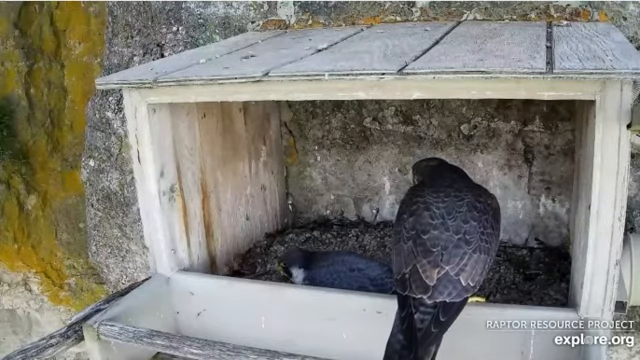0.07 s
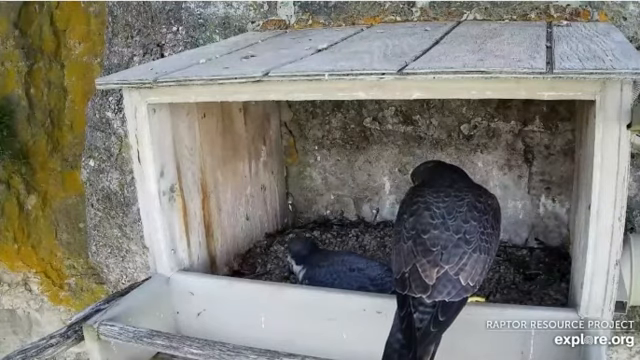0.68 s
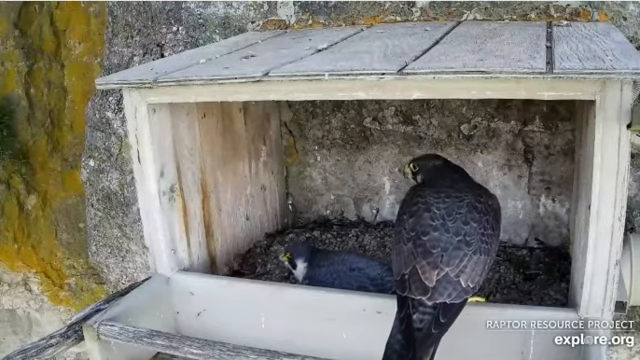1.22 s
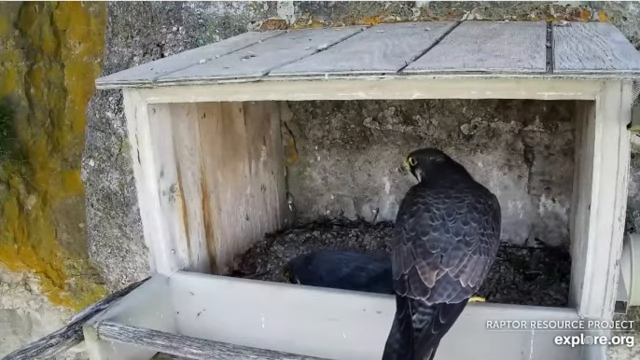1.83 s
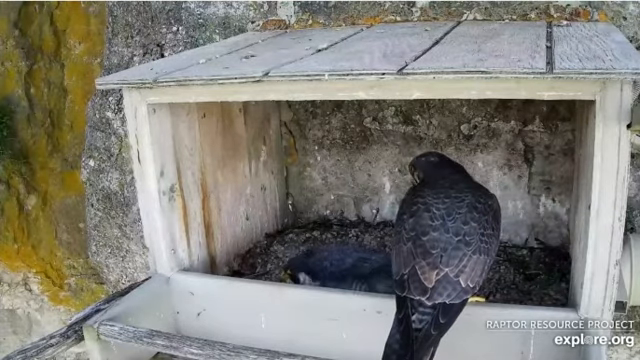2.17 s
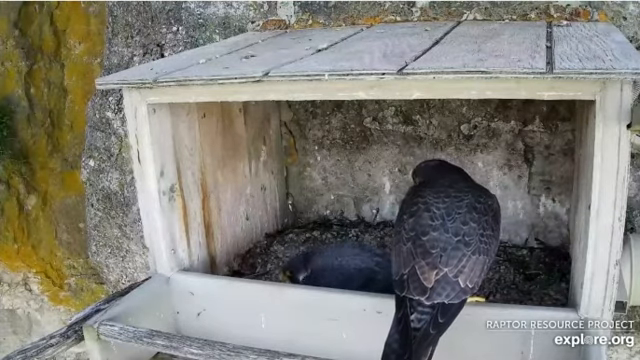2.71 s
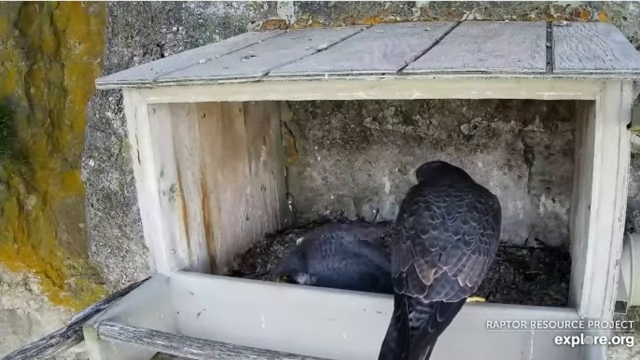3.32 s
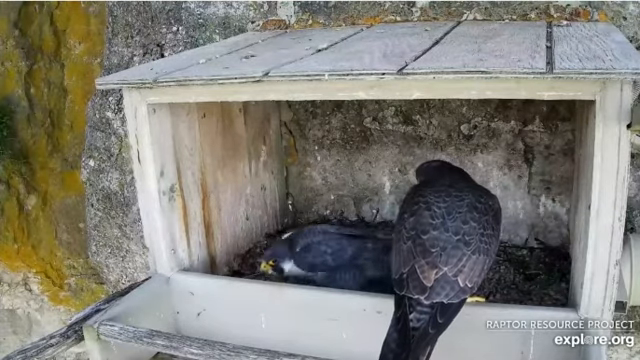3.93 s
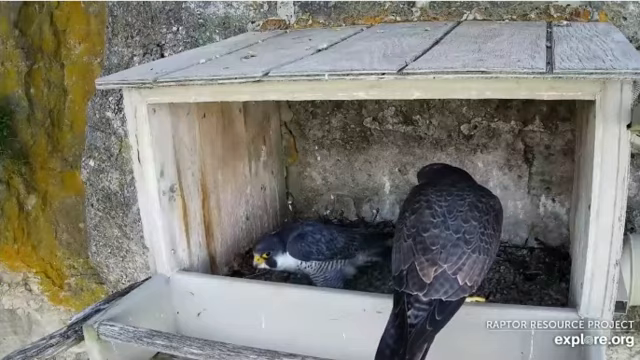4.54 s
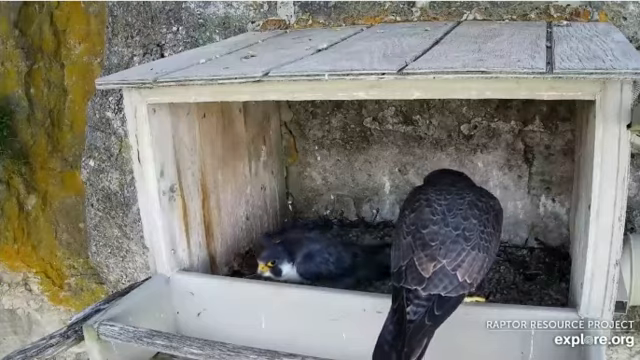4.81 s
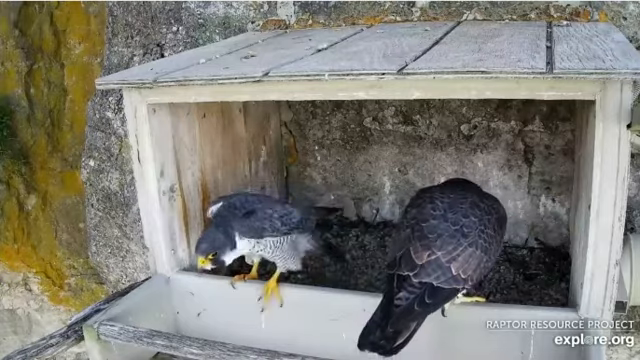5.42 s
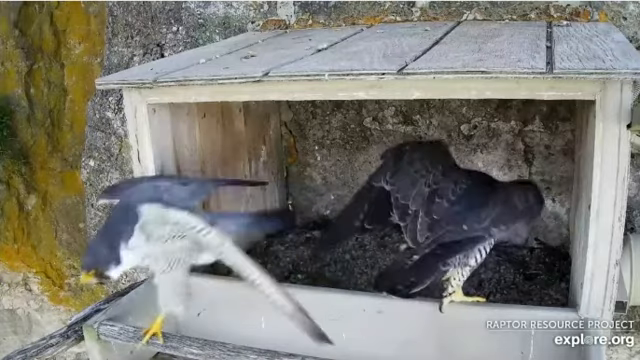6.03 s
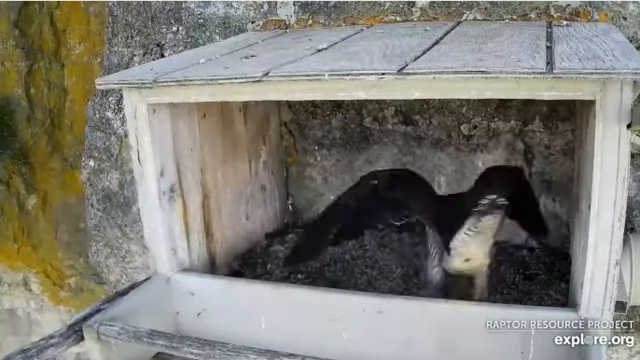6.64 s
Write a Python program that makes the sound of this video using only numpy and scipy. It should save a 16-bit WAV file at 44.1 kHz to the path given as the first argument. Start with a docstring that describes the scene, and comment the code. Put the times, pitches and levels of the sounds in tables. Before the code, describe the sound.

A steady low hum and soft outdoor air lie under the faint twittering of a distant songbird. Then a falcon calls right by the microphone, four sharp, rasping double calls with a brief ring, the last after a slightly longer pause. Soft feather rustling comes and goes, and the sound ends with a few quick knocks and wing brushes against the boards of a wooden nest box.

```python
"""A falcon calls in a wooden nest box on a wall, close to a mono microphone, as two birds swap places.
Four harsh pairs of calls: membranes in its throat whistle, then break into a rasp of slaps, and each
rasp sets off a sharp, narrow ring. Just as near, feathers rustle and feet and wings knock on the boards.
Far off a small bird twitters, over a low hum and outdoor air."""
import sys
import numpy as np
from scipy import signal
from scipy.fft import rfft, irfft
from scipy.io import wavfile
from scipy.ndimage import uniform_filter1d, minimum_filter1d

SR = 44100
rng = np.random.default_rng(int(sys.argv[2]) if len(sys.argv) > 2 else 0)


def unload_audio(sound):
    """Save the sound as a 16-bit wav file, at the path given as the first command line argument."""
    columns = np.transpose(np.atleast_2d(sound))
    # keep every value between -1 and 1, then stretch to whole-number steps
    steps = np.round(np.clip(columns, -1, 1) * 32767)
    wavfile.write(sys.argv[1], SR, steps.astype(np.int16))


N = 294588
TIME = np.arange(N) / SR

# spectrum of the outdoor air: f/Hz, relative level/dB
AIR_SPECTRUM = [(82, -3), (140, 0.5), (207, -6.5), (289, 0.5), (444, -7), (550, -8.5), (669, -10),
                (1050, -0.5), (1300, -2.5), (1550, -19), (2160, -17.5), (2900, -29.5), (3820, -36),
                (6340, -45), (15000, -47)]
# rise and fall of the breeze, before scaling by gustiness: t/s, relative level/dB
BREEZE_CURVE = [(0.0, -46), (0.93, -50), (2.4, -48), (2.6, -44), (3.0, -47), (5.15, -48), (5.47, -46),
                (6.68, -50)]
# noise bands of the low drone: f/Hz, width/Hz, level/dB
DRONE_BANDS = [(38, 21, -48), (100.7, 15, -42), (242, 18, -59)]
# far songbird, buzzes: t/s, length/s, flick rate/Hz, low f/Hz, nominal top f/Hz, relative level/dB
SONG_BUZZES = [(0.143, .2, 140, 3720, 6300, -57.5), (0.421, 0.2, 150, 4070, 5920, -64.5)]
# far songbird, twittering phrases: t/s, length/s, note rate/Hz, relative level/dB
SONG_TWITTERS = [(0.589, 0.065, 30, -60.5), (0.759, 0.1, 25, -63.5), (0.958, .1, 25, -64.5),
                 (1.158, 0.054, 34, -57), (1.561, 0.1, 28, -61.5), (1.791, 0.067, 34, -62),
                 (1.954, 0.052, 62, -61), (2.14, 0.05, 62, -62), (2.322, 0.049, 58, -63)]
# far songbird, slurred notes: t/s, length/s, start f/Hz, end f/Hz, level/dB
SONG_SLURS = [(2.88, .05, 5300, 3300, -70.5), (2.925, .045, 3200, 4600, -65),
              (3.05, .065, 5800, 3300, -74.5), (5.025, .04, 3200, 3750, -64), (5.355, .06, 3050, 4150, -59)]
# feathers brush as a bird shifts or opens its wings: peak t/s, relative level/dB, 20 dB rise/s, 20 dB fall/s
FEATHER_BRUSHES = [(1.892, -55, .14, .13), (2.3, -74, .5, .4), (2.56, -67, .4, .4), (3.2, -63, .3, .3),
                   (3.58, -59, .5, .3), (3.828, -51, .06, .09), (4.78, -72, .15, .1), (5.03, -60, .11, .22),
                   (5.38, -55, .12, .11), (5.7, -67, .1, .17), (6.22, -57, .2, .1), (6.49, -47, .25, .13),
                   (6.67, -56, .25, .2)]
# quill flicks and grit: t/s, level/dB, 40 dB fall/s
QUILL_FLICKS = [(1.955, -60, 0.025), (2.09, -63, 0.023), (3.493, -52, .05), (4.33, -62.5, 0.053),
                (4.407, -59.5, 0.034), (4.675, -61, .02), (5.212, -51, 0.017), (5.513, -46, 0.033),
                (6.29, -56.5, 0.038), (6.476, -65, 0.048), (6.491, -36, 0.02)]
# spectrum of feather noise: f/Hz, relative level/dB
FEATHER_SPECTRUM = [(1500, -12), (3500, -3), (7500, 1), (10000, -1), (14000, -3), (16000, -8)]
# feet and wings against the box: t/s, relative level/dB, hardness as low-pass f/Hz
BOX_KNOCKS = [(5.514, -42.5, 3550), (5.738, -42.5, 700), (6.288, -38.5, 3000), (6.382, -40.5, 1810),
              (6.494, -42.5, 1500), (6.525, -29.5, 340)]
# modes of the boards: f/Hz, relative level/dB, 60 dB fall/s
BOARD_MODES = [(175, 5, 0.085), (218, 4, 0.08), (392, 1.5, 0.058), (458, 6, 0.072), (873, -21.5, .03),
               (1630, 2, 0.031), (1710, -6.5, .03), (2640, 2, .012)]
# resonances that colour the rasp, dark and bright: f/Hz, width/Hz, relative gain/dB
DARK_RASP_MODES = [(150, 270, 0), (281.6, 22, -3.5), (444, 220, -7.5), (779, 63, 4.5), (1117, 180, 1.5),
                   (1333, 110, -1)]
BRIGHT_RASP_MODES = [(1896, 37, 9.5), (2723, 160, 9), (3000, 110, 12.5), (3800, 130, -21), (5350, 760, -27),
                     (7720, 450, -17)]
# throat resonances that growl under a slack whistle: f/Hz, width/Hz, relative gain/dB
GROWL_THROAT = [(750, 310, 1.5), (1920, 250, -2), (2620, 250, -6), (3470, 130, -10.5)]
# narrow resonances that ring on after a call: f/Hz, width/Hz, gain/dB
AFTER_RING_MODES = [(3170, 9, -23), (4020, 45, -16), (4250, 12, -22)]
# first call of each pair: t/s; opening rasp: time to yelp/s, pulse rate/Hz, dark/dB, bright/dB;
# yelp: length/s, start f/Hz, arch/Hz, level/dB, half-pitch lines/dB, overtones/dB;
# closing rasp: length/s, level/dB, ring f/Hz, ring gain/dB
YELP_CALLS = [(1.079, .049, 256, -17, -17, .017, 2170, 0, -22, -37, -40, .018, -20, 3070, 4),
              (2.406, .046, 282, -13, -14, .025, 2250, 20, -17, -42, -43, .026, -19, 3140, 6),
              (3.246, .052, 296, -13, -14, .025, 2270, 40, -20, -18, -41, .022, -18, 1900, 11),
              (5.235, .039, 247, -21, -23, .039, 2020, 210, -21.5, -50, -37, .021, -19, 1800, 3)]
# second call of each pair: t/s, length/s; top of the rise: f/Hz, level/dB, octave/dB, half-pitch lines/dB;
# crack: f/Hz, level/dB, octave/dB, half-pitch lines/dB;
# rasp: dark/dB, bright/dB, dulling/(dB/s), ring f/Hz, ring gain/dB
RISING_CALLS = [(1.378, .101, 2260, -12, -27, -36, 1900, -18, -13, -29, -17, -14, 40, 2810, 15),
                (2.709, .111, 2400, -13, -21, -38, 2150, -14, -20, -12, -18, -13, 250, 3080, 3),
                (3.656, .105, 2340, -18, -25, -30, 2090, -12, -16, -12, -16, -10, 300, 2930, 0),
                (5.549, .106, 2430, -11, -32, -33, 2060, -19, -18, -16, -14.5, -14, 280, 3110, 5)]

CLOSE_LEAD_S = .005  # the closing rasp takes over just before the yelp ends
SLOWING_HZ_PER_S = 1700  # the pulses slow down at the end of every call


def from_db(db):
    """Decibels to gain."""
    return 10 ** (np.asarray(db) / 20)


def rms_one(x):
    """Scale to unit rms."""
    return x / np.sqrt(np.mean(x ** 2) + 1e-20)


def add(out, s, sound):
    """Mix a sound in at s seconds."""
    at = max(int(s * SR), 0)
    out[at:at + len(sound)] += sound[:max(N - at, 0)]


def filtered(x, hz, kind, order=2):
    """Butterworth filter."""
    return signal.sosfilt(signal.butter(order, np.clip(hz, 10, .45 * SR), kind, fs=SR, output="sos"), x)


def wobble(size, hz):
    """Random motion below hz, rms 1."""
    return rms_one(filtered(rng.standard_normal(size + SR // 4), hz, "low")[-size:])


def coloured(points):
    """Noise with a given spectrum, rms 1."""
    hz, db = np.transpose(points)
    gain = from_db(np.interp(np.log(np.fft.rfftfreq(N, 1 / SR) + 1), np.log(hz), db))
    return rms_one(irfft(rfft(rng.standard_normal(N)) * gain, N))


def resonate(x, modes):
    """Parallel resonances: f/Hz, width/Hz, gain/dB."""
    out = 0
    for hz, width, db in modes:
        r = np.exp(-np.pi * width / SR)
        zeros = np.array([1, 0, -1]) * (1 - r * r) / 2
        poles = [1, -2 * r * np.cos(2 * np.pi * hz / SR), r * r]
        out = out + from_db(db) * signal.lfilter(zeros, poles, x + 1e-18)
    return out


def echoes(x, t60, dull_hz, wet_db):
    """Dense reflections reach the microphone after the direct sound and die away."""
    t = np.arange(int(t60 * SR)) / SR
    tail = filtered(rng.standard_normal(len(t)), dull_hz, "low") * from_db(-60 * t / t60) * (t > .002)
    return x + from_db(wet_db) * signal.fftconvolve(x, tail / np.linalg.norm(tail))[:N]


def noise_band(hz, width):
    """A narrow band of rumble, rms 1."""
    return rms_one(filtered(rng.standard_normal(N + SR), [hz - width / 2, hz + width / 2], "band")[SR:])


def outdoors(air_db=-45, gustiness=.63, hum_hz=80.3, hum_db=-31.5, beat_db=-39):
    """Around the box, a steady hum beats against narrow bands of rumble under the wash of air."""
    s, db = np.transpose(BREEZE_CURVE)
    air = from_db(air_db + gustiness * np.interp(TIME, s, db - np.median(db))) * coloured(AIR_SPECTRUM)
    hum = from_db(hum_db) * np.sqrt(2) * np.sin(2 * np.pi * np.cumsum(hum_hz + .58 * wobble(N, 3)) / SR)
    beating = from_db(beat_db) * noise_band(hum_hz, width=14)
    drone = sum(from_db(level) * noise_band(hz, width) for hz, width, level in DRONE_BANDS)
    return air + hum + beating + drone


def songbird(buzz_sag=.23, twitter_low_hz=3570, chip_arch_hz=550):
    """Far from the microphone, one gliding pure tone makes buzzes, twitters and single slurs."""
    out = np.zeros(N)
    sing = lambda pitch: np.sin(2 * np.pi * np.cumsum(pitch) / SR)
    for s, length, rate, low, high, db in SONG_BUZZES:
        u = np.linspace(0, 1, int(length * SR))
        flicks = np.cumsum(rate * (1 + .07 * wobble(len(u), 98))) / SR
        reach = .74 + .56 * (np.floor(flicks) % 2)  # every other flick goes higher
        pitch = (low + (high - low) * (flicks % 1) * reach) * (1 - buzz_sag * u ** 3)
        swell = np.sin(np.pi * (flicks % 1)) * np.minimum(1, 20 * u) * (1 - u ** 2)
        add(out, s, from_db(db + 2.5) * swell * sing(pitch))
    for s, length, rate, db in SONG_TWITTERS:
        top_hz = 6300 - 600 * (s - SONG_TWITTERS[0][0])  # later phrases reach less high
        u = np.linspace(0, 1, int(length * SR))
        note = (u * length * rate) % 1
        # each note is a low chip, a break, then a flick upward, all of uneven strength
        swell = np.sqrt(np.abs(np.sin(2 * np.pi * note))) * (1.2 - note / 2)
        swell *= from_db(3 * wobble(len(u), 150))
        chip = chip_arch_hz * (np.sin(2 * np.pi * note) - .5)
        flick = (top_hz - twitter_low_hz) * (2 * note - 1)
        pitch = twitter_low_hz + np.where(note < .5, chip, flick) * (1 + .03 * wobble(len(u), 60))
        add(out, s, from_db(db + 1.5) * swell * sing(pitch))
    for s, length, first, last, db in SONG_SLURS:
        u = np.linspace(0, 1, int(length * SR))
        add(out, s, from_db(db) * np.sin(np.pi * u) * sing(first + (last - first) * u))
    return echoes(out, t60=.18, dull_hz=7000, wet_db=-8)


def feathers(grain_db=3.5, rustle_db=-6):
    """Close by, barbs slide over each other in fine grains; now and then a quill flicks."""
    level, t = np.zeros(N), TIME[:SR // 8]
    for s, db, rise, fall in FEATHER_BRUSHES:
        below_peak_db = 20 * np.maximum((s - TIME) / rise, (TIME - s) / fall)
        level = np.maximum(level, from_db(db + rustle_db - below_peak_db))
    for s, db, fall in QUILL_FLICKS:
        add(level, s, from_db(db - 40 * t / fall) * (1 - np.exp(-t / .00042)))
    return level * rms_one(coloured(FEATHER_SPECTRUM) * from_db(grain_db * wobble(N, 300)))


def knocks():
    """Soft or hard contacts ring the boards next to the microphone."""
    out, t = np.zeros(N), TIME[:SR // 4]
    for s, db, hardness_hz in BOX_KNOCKS:
        ring = sum(from_db(level + rng.normal(0, 1.5) - 60 * t / t60) * np.sin(2 * np.pi * hz * t)
                   for hz, level, t60 in BOARD_MODES)
        add(out, s, from_db(db) * filtered(ring, hardness_hz, "low"))
    return out


def thuds(after_yelp_db=-22, after_rise_db=-14, lead_s=.005):
    """A heavily damped low swing, and a slower one under it, as each call is choked off."""
    out, t = np.zeros(N), TIME[:SR // 8]
    swing = lambda db, hz, decay_s: from_db(db) * np.sin(2 * np.pi * hz * t) * np.exp(-t / decay_s)
    ends = [(s + open_s + yelp_s - CLOSE_LEAD_S + close_s, after_yelp_db)
            for s, open_s, _, _, _, yelp_s, *_, close_s, _, _, _ in YELP_CALLS]
    ends += [(s + length, after_rise_db) for s, length, *_ in RISING_CALLS]
    for s, db in ends:
        add(out, s - lead_s, swing(db, hz=110, decay_s=.0048) + swing(-21, hz=36, decay_s=.013))
    return out


def moments(length):
    """Control times through one part of a call."""
    return np.linspace(0, length, 60)


def edges_db(t, attack_s, release_s, depth_db=18):
    """Attack, hold and release, in dB relative to the hold."""
    return -depth_db * (np.clip(1 - t / attack_s, 0, 1) + np.clip(1 - (t[-1] - t) / release_s, 0, 1))


def waver_db(t, depth_db=2, hz=70):
    """Chance swings by which a whistle's fundamental and octave trade strength."""
    return depth_db * np.interp(t * SR, np.arange(SR // 4), wobble(SR // 4, hz))


def controls(*columns):
    """Curves and constants side by side, one row per moment."""
    return np.transpose(np.broadcast_arrays(*columns))


def gesture(rows, fade_s=.005):
    """Start time, soft-edged gate and sampled controls of one utterance."""
    s, *columns = np.transpose(rows)
    t = np.arange(s.min() - fade_s, s.max() + fade_s, 1 / SR)
    gate = np.sin(np.pi / 2 * np.clip(np.minimum(t - t[0], t[-1] - t) / fade_s, 0, 1)) ** 2
    return t[0], gate, [np.interp(t, s, column) for column in columns]


def evened(x):
    """Hold the short-time level at 1."""
    return x / np.sqrt(np.abs(uniform_filter1d(x * x, 400)) + 1e-12)


def scattered(x, feedback=.71):
    """Quick bounces smear each pulse over a few milliseconds without colouring it."""
    for lag in rng.integers(17, 70, 3):
        taps = np.r_[feedback, np.zeros(lag), 1]
        x = signal.lfilter(taps, taps[::-1], x)
    return x


def rasp(rows, ring_hz, ring_db, ring_width_hz=45, jitter=.035, uneven_db=2.2, air_db=-30):
    """Uneven slaps of the membranes, each with a puff of air; the rasp sets off a sharp, narrow ring."""
    start, gate, (rate, dark_db, bright_db) = gesture(rows)
    size = len(gate)
    cycles = np.cumsum(rate * (1 + jitter * wobble(size, 160))) / SR
    slaps = np.diff(np.floor(cycles), prepend=-1) * from_db(uneven_db * rng.standard_normal(size))
    puffs = from_db(air_db) * rng.standard_normal(size) * np.exp(-2.5 * (cycles % 1))
    source = scattered(slaps + puffs)
    dark = evened(filtered(resonate(source, DARK_RASP_MODES), 1800, "low"))
    bright = filtered(resonate(source, BRIGHT_RASP_MODES), 1400, "high")
    bright = evened(filtered(bright, 9000, "low", order=3))
    voice = np.pad(gate * (from_db(dark_db) * dark + from_db(bright_db) * bright), (0, SR // 10))
    return start, voice + resonate(voice, [(ring_hz, ring_width_hz, ring_db)])


def whistle(rows, flutter_hz=440, jitter=.02, shimmer=.36, tilt_db=-5, strain_db=-25):
    """A membrane tone near 2 kHz: clean when taut, rough when slack or when period doubling sets in."""
    start, gate, (pitch, first_db, octave_db, half_db, upper_db) = gesture(rows)
    size = len(gate)
    rough = np.clip(1 + (half_db - first_db + 12) / 25 + (2100 - pitch) / 900, .25, 1.1)
    phase = 2 * np.pi * np.cumsum(pitch * (1 + jitter * rough * wobble(size, flutter_hz))) / SR

    def line(k):
        """A fluttering partial at k times the pitch."""
        partial = np.sqrt(2) * np.sin(k * phase + rng.uniform(0, 2 * np.pi))
        return partial * (1 + shimmer * rough * wobble(size, flutter_hz))

    def hiss(band_hz):
        """Air torn by the membrane hisses once per cycle."""
        air = filtered(rng.standard_normal(size), band_hz, "band", order=3)
        return rms_one(air * (1 + np.sin(phase)))

    tone = from_db(first_db) * line(1) + from_db(octave_db) * line(2)
    halves = sum(from_db(db) * line(k) for k, db in [(.5, -7.5), (1.5, -3), (2.5, -13.5), (3.5, -18)])
    # a slack membrane growls instead of doubling cleanly
    slack = np.clip((2150 - pitch) / 300, 0, 1)
    growl = from_db(1.5) * rms_one(resonate(rng.standard_normal(size), GROWL_THROAT))
    undertone = np.sqrt(1 - slack) * halves + np.sqrt(slack) * growl
    overtones = rms_one(sum(from_db(tilt_db * k) * line(k) for k in range(3, 7)))
    upper = overtones + from_db(-8) * rough * hiss([3500, 10000])
    upper = rms_one(upper + resonate(upper, [(8040, 1500, 3)]))  # the throat's highest resonance
    # at the height of the strain the voice cracks into a bright screech
    screech = from_db(np.clip(2 * (upper_db - strain_db), -20, 2) - 5) * hiss([7000, 13000])
    return start, gate * (tone + from_db(half_db) * undertone + from_db(upper_db) * (upper + screech))


def yelp_call(s, open_s, rate, dark_db, bright_db, yelp_s, yelp_hz, arch_hz, yelp_db, half_db, upper_db,
              close_s, close_db, ring_hz, ring_db, gap_s=.003, end_hz=1900, throat_hz=4100):
    """A rasp catches into a falling yelp and breaks up again; gives three parts with their start times."""
    # the opening rasp starts hard, quickens a little and loses its brightness first
    t = moments(open_s - gap_s)
    dark = dark_db + edges_db(t, attack_s=.0045, release_s=.015)
    bright = bright_db - 280 * t + edges_db(t, attack_s=.0045, release_s=.005)
    quickening = rate + 350 * (t - open_s / 2)
    opening = rasp(controls(s + t, quickening, dark, bright), ring_hz=2480, ring_db=3)

    t = moments(yelp_s)
    pitch = yelp_hz + (end_hz - yelp_hz) * t / yelp_s + arch_hz * np.sin(np.pi * t / yelp_s)
    edge, waver = edges_db(t, attack_s=.003, release_s=.003), waver_db(t)
    # the octave swells where it passes a throat resonance
    octave_db = yelp_db - 12 + 11 / (1 + ((2 * pitch - throat_hz) / 200) ** 2)
    yelp = whistle(controls(s + open_s + t, pitch, yelp_db + edge + waver, octave_db + edge - waver,
                            half_db + edge, upper_db + edge))

    t = moments(close_s)
    close_at = s + open_s + yelp_s - CLOSE_LEAD_S
    dark = close_db + edges_db(t, attack_s=.004, release_s=.006)
    slowing = 340 - SLOWING_HZ_PER_S * t
    return opening, yelp, rasp(controls(close_at + t, slowing, dark, dark - 2), ring_hz, ring_db)


def rising_call(s, length, top_hz, top_db, top_octave_db, rising_half_db,
                crack_hz, crack_db, crack_octave_db, crack_half_db,
                dark_db, bright_db, dulling_db_per_s, ring_hz, ring_db,
                rise_s=.05, crack_s=.03, drop_s=.006, collapse_at_s=.064):
    """A whistle climbs, cracks into a doubled screech and collapses; gives two parts with start times."""
    blend = lambda first, last, amount: first + (last - first) * amount
    t = moments(rise_s + crack_s)
    # pitch and strength grow with effort; the octave swells midway up
    effort = np.minimum(t / rise_s, 1) ** .85
    rising = controls(blend(1790, top_hz, effort),
                      blend(-28, top_db, effort ** 1.9),
                      blend(-31, top_octave_db, effort) + 3 * np.sin(np.pi * effort),
                      rising_half_db, blend(-41, -29, effort))
    # the crack: the pitch drops, the upper lines jump, then the tone sags and dies under the rasp
    since_drop = np.maximum(t - rise_s - drop_s, 0)
    sag_hz, dulling_db = 2500 * since_drop, 400 * since_drop
    cracked = controls(crack_hz - sag_hz, crack_db, crack_octave_db - dulling_db,
                       crack_half_db, -20 - dulling_db)
    pitch, first, octave, half, upper = blend(rising.T, cracked.T, np.clip((t - rise_s) / drop_s, 0, 1))
    edge, waver = edges_db(t, attack_s=.005, release_s=.005), waver_db(t)
    tone = whistle(controls(s + t, pitch, first + edge + waver, octave + edge - waver,
                            half + edge, upper + edge))

    t = moments(length - collapse_at_s)
    dark = dark_db + edges_db(t, attack_s=.009, release_s=.006)
    bright = bright_db - dulling_db_per_s * t + edges_db(t, attack_s=.004, release_s=.006)
    slowing = 355 - SLOWING_HZ_PER_S * t
    return tone, rasp(controls(s + collapse_at_s + t, slowing, dark, bright), ring_hz, ring_db)


def falcon():
    """Whistles and rasps of one voice at close range, with a brief ring after them."""
    out = np.zeros(N)
    for call in [yelp_call(*row) for row in YELP_CALLS] + [rising_call(*row) for row in RISING_CALLS]:
        for start, sound in call:
            add(out, start, sound)
    return out + resonate(out, AFTER_RING_MODES)


def scene():
    """One microphone feeds both channels; calls and knocks echo briefly inside the box."""
    inside = echoes(falcon() + knocks(), t60=.065, dull_hz=10800, wet_db=-14.5)
    mono = inside + thuds() + feathers() + songbird() + outdoors()
    return np.array([mono, mono])


def record(dry, ceiling=.39, cutoff_hz=15700):
    """After the microphone, a fast limiter holds the peaks of the calls and a steep filter cuts the top."""
    gain = np.minimum(1, ceiling / (np.abs(dry).max(axis=0) + 1e-9))
    gain = uniform_filter1d(minimum_filter1d(gain, size=45), size=45)
    return signal.sosfilt(signal.ellip(10, .1, 80, cutoff_hz, fs=SR, output="sos"), dry * gain)


dry = scene()
out = record(dry)
unload_audio(out)
```